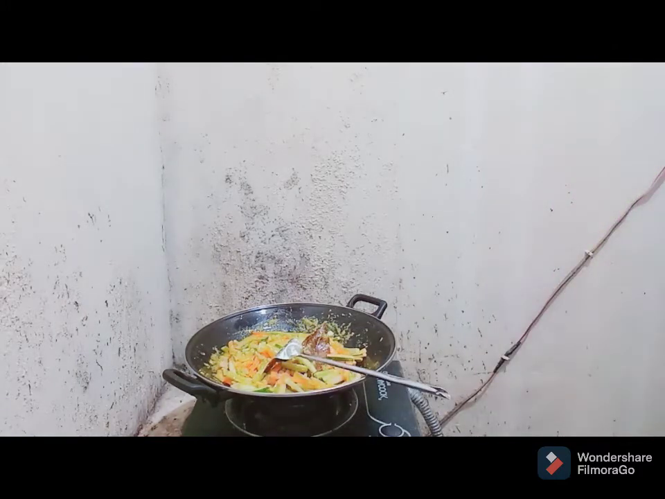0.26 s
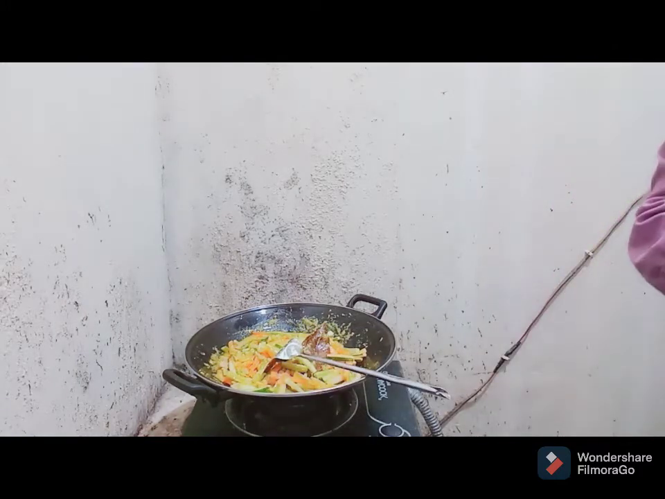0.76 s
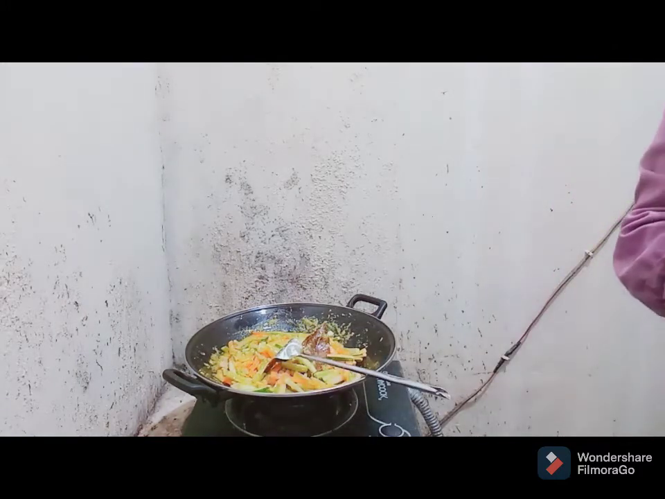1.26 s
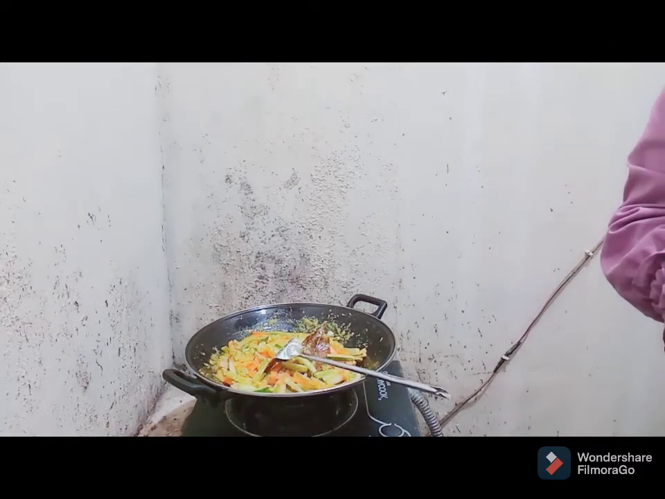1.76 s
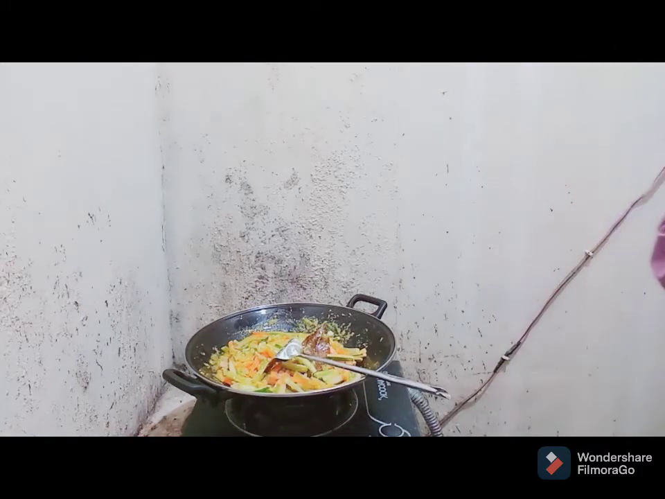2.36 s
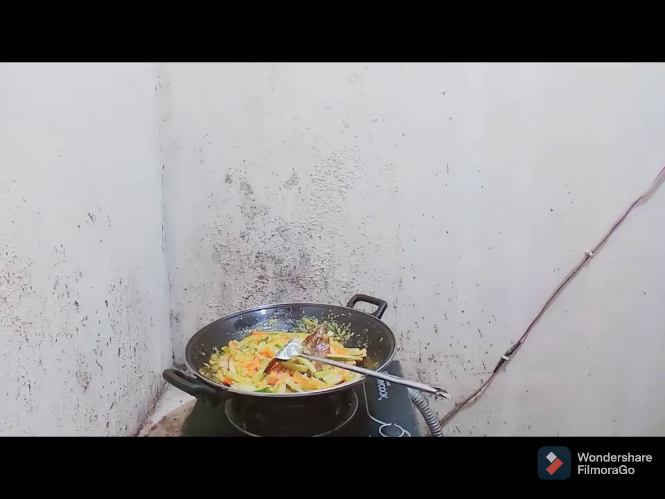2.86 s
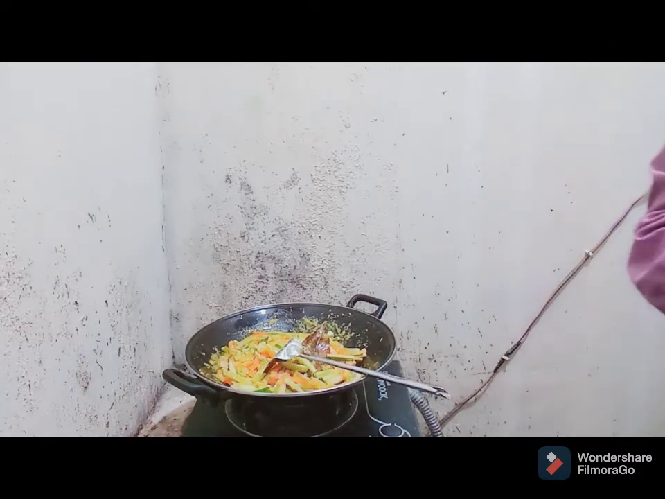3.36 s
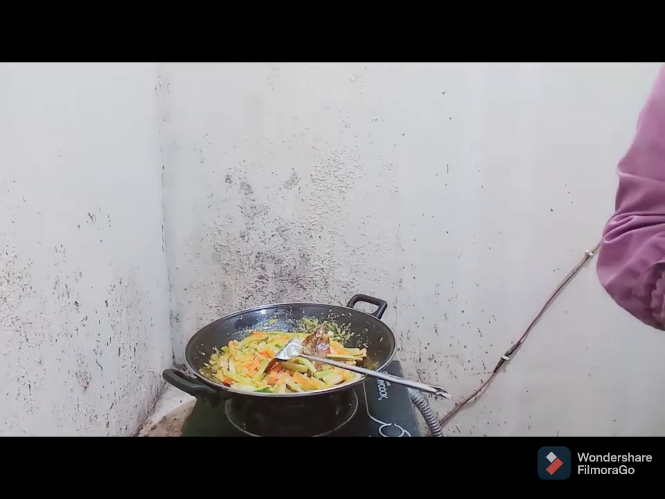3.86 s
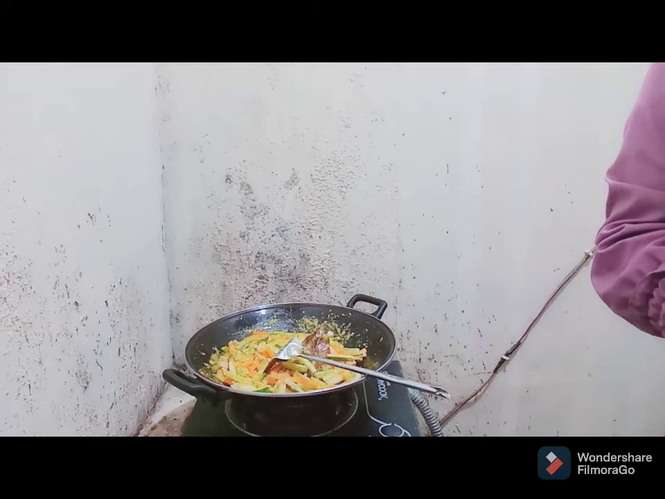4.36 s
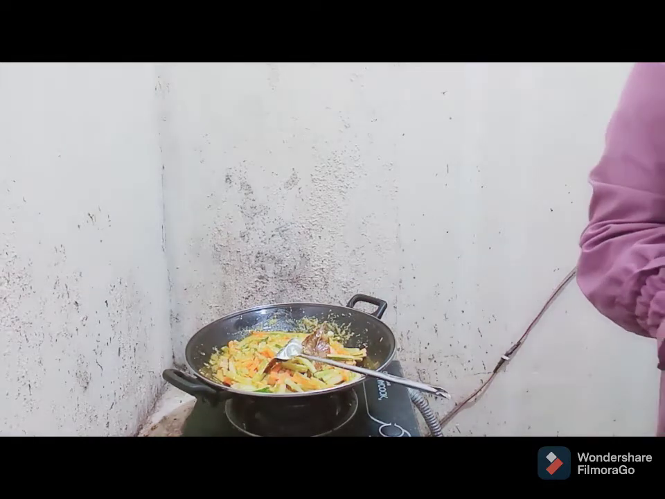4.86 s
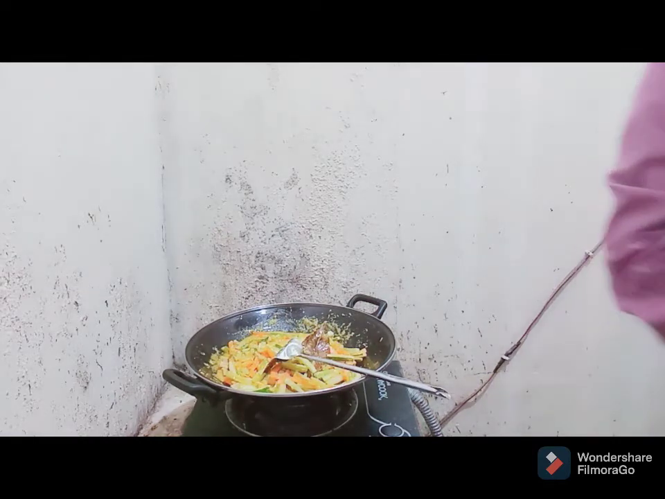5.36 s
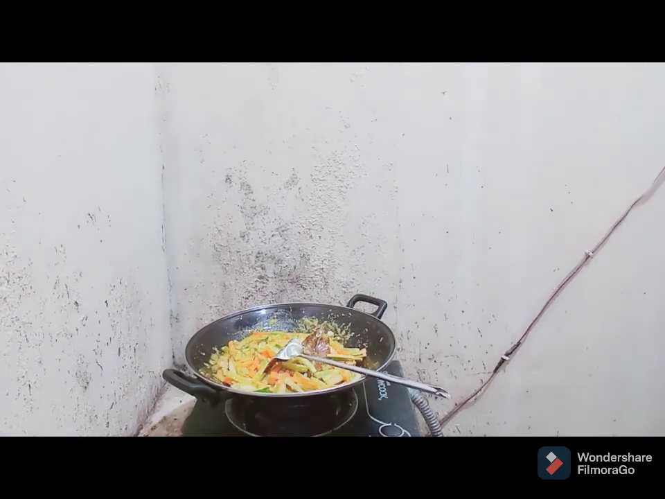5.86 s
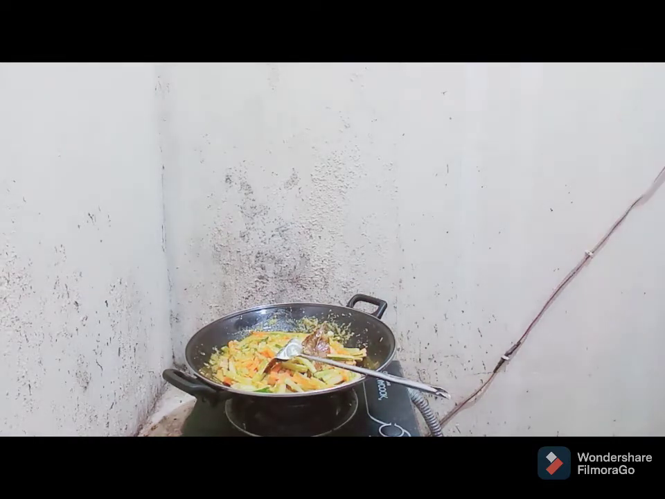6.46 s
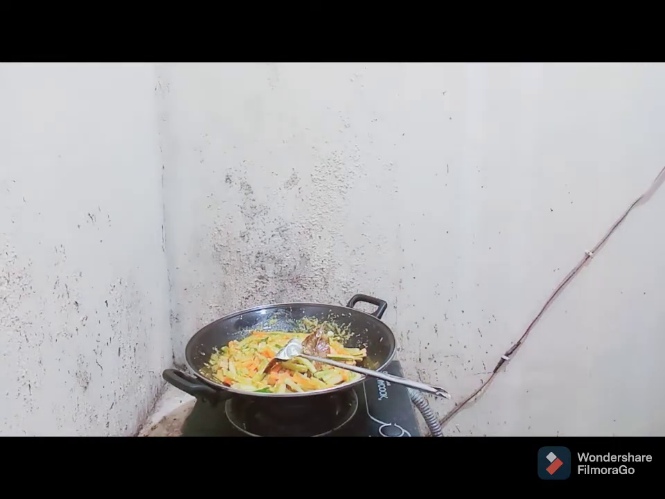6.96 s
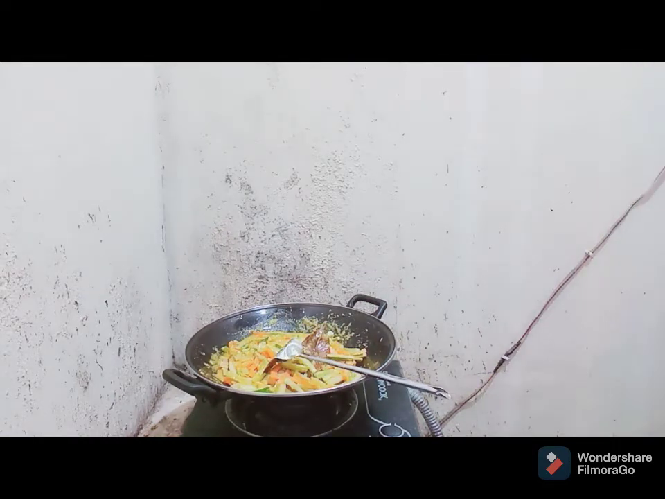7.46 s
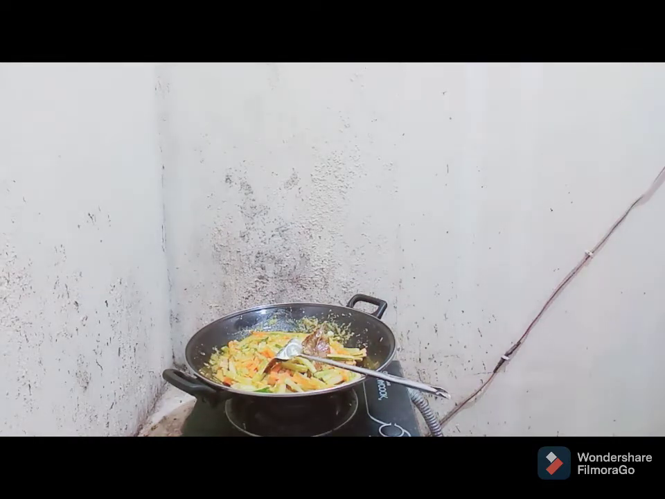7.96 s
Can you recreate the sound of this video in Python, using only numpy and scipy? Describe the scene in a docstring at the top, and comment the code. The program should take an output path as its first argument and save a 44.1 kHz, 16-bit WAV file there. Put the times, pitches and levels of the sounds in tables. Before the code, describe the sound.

Over a steady motor hum in a small hard kitchen, a hollow container knocks down three times, then water splashes and dishes clash with a ringing pot.

```python
"""A motor hums and small squeaks come first, in a small hard-walled kitchen beside the stove.
A hollow container is then knocked down three times and rattles, and a glass clinks faintly.
Later something scrapes, water splashes over dishes, two of them clash and a metal pot is set down and rings.
Hum is sines, struck things are decaying modes with noise cracks, water is drops and bubbles, and rubbing
is shaped noise; all but the motor feed the room's reverberation at the microphone."""
import sys
import numpy as np
from scipy import signal
from scipy.fft import rfft, irfft
from scipy.io import wavfile
from scipy.ndimage import uniform_filter1d

SR = 44100
rng = np.random.default_rng(int(sys.argv[2]) if len(sys.argv) > 2 else 0)


def put_to_file(sound):
    """Save the sound as 16-bit audio at rate SR, in the file named by the first command-line argument."""
    columns = np.atleast_2d(sound).T  # one column per channel
    safe = np.clip(columns, -1, 1)
    whole_steps = np.round(safe * 32767)
    wavfile.write(sys.argv[1], SR, whole_steps.astype(np.int16))


N = 362502
TIME = np.arange(N) / SR  # s


def from_db(db):
    """Decibels to gain."""
    return 10 ** (np.asarray(db) / 20)


def rms_one(x):
    """Scale to rms 1."""
    return x / max(np.sqrt(np.mean(x ** 2)), np.finfo(float).tiny)


def peak_one(x):
    """Scale to peak 1."""
    return x / np.abs(x).max()


def at_hz(points, hz):
    """Read a table on a log-frequency axis."""
    table = np.array(points)
    return np.interp(np.log(hz), np.log(table[:, 0]), table[:, 1])


def in_time(rows):
    """Each column of a curve at every sample, and a smoothed gate that is open while the curve lasts."""
    s, *columns = np.transpose(rows)
    lasts = (TIME >= s[0]) & (TIME <= s[-1])
    gate = uniform_filter1d(lasts * 1.0, size=400)
    return [np.interp(TIME, s, c) for c in columns] + [gate]


def add(out, s, sound):
    """Mix a sound in from time s on."""
    start = max(int(s * SR), 0)
    out[start:start + len(sound)] += sound[:max(N - start, 0)]


def colour(x, spectrum):
    """Give a signal a spectrum through a minimum-phase filter, so nothing sounds early; rms 1."""
    size = 4096
    hz = np.maximum(np.fft.rfftfreq(size, 1 / SR), 5)
    bass_slope = np.minimum(hz / spectrum[0][0], 1) ** 2  # 12 dB per octave below the first point
    gain = from_db(at_hz(spectrum, hz)) * bass_slope
    cepstrum = irfft(np.log(gain))[:size // 2]
    # folding the cepstrum onto positive time gives minimum phase
    response = irfft(np.exp(rfft(2 * cepstrum, size)))
    return rms_one(signal.fftconvolve(x, rms_one(response))[:len(x)])


def drift(rate):
    """Random wander of rms 1, through a new value rate times a second."""
    knots = rng.standard_normal(N // 8)
    return rms_one(np.interp(TIME * rate, np.arange(len(knots)), knots))


def fade(t60, size):
    """Exponential decay by 60 dB in t60 seconds."""
    return np.exp(-np.log(1000) * TIME[:size] / max(t60, 1e-4))


def ring(modes, size):
    """Struck modes, each a decaying sine, of alternating sign."""
    out = np.zeros(size)
    for k, (hz, db, t60) in enumerate(modes):
        sine = np.sin(2 * np.pi * hz * TIME[:size])
        out += (-1) ** k * from_db(db) * fade(t60, size) * sine
    return out


def crack(spectrum, t60, size):
    """The crowd of short-lived modes that a contact excites, as decaying coloured noise."""
    return colour(rng.standard_normal(size) * fade(t60, size), spectrum)


def soften(x, cut_hz):
    """A contact of finite length cannot excite the top."""
    return signal.sosfilt(signal.butter(4, cut_hz, fs=SR, output="sos"), x)


def swell(s, db, half_length):
    """Gaussian rise and fall around time s, as a gain."""
    return from_db(db) * np.exp(-((TIME - s) / half_length) ** 2)


# Motor harmonics: (multiple of the shaft rate, middle level [dB rms])
SHAFT_HARMONICS = [(1, -84), (8, -73.5), (9, -57), (10, -60.5), (11, -69), (12, -85), (13, -74), (21, -74),
                   (22, -71.5), (27, -71.5), (28, -76.5)]
SHAFT_HZ = 49.16
MAINS_HZ, MAINS_DB = 100, -63.5  # middle level, dB rms
# Low steady noise: (frequency [Hz], density [dB per Hz, relative])
RUMBLE_COLOUR = [(30, -26), (48, -1.5), (75, -1.5), (92, 4), (112, 7.5), (135, 0.5), (170, 0), (215, -10),
                 (300, -7.5), (450, -7), (650, -11), (900, -52)]
# Rushing air: (frequency [Hz], density [dB per Hz, relative])
AIR_COLOUR = [(750, -11), (900, -11), (1040, 1), (1200, -6), (1450, -3), (2200, -9), (3300, -11),
              (4200, -17), (4800, -25), (5500, -42), (7000, -33), (8500, -43), (10500, -46), (15000, -49)]
RUMBLE_DB, AIR_DB = -55, -59  # dB rms


def motor(waver_db=1.0, mains_waver_db=5.5):
    """Background: harmonics of the shaft and a wavering mains hum, over rumble and rushing air."""
    turns = 2 * np.pi * np.cumsum(SHAFT_HZ * (1 + 0.001 * drift(1.8))) / SR
    hum = np.zeros(N)
    for multiple, db in SHAFT_HARMONICS:
        phase = round(multiple) * turns + rng.uniform(0, 2 * np.pi)
        hum += from_db(db + waver_db * drift(4.8)) * np.sin(phase)
    mains_level = from_db(MAINS_DB + mains_waver_db * drift(5.5))
    mains = mains_level * np.sin(2 * np.pi * MAINS_HZ * TIME + 0.54 * drift(5.6))
    rumble = from_db(RUMBLE_DB) * colour(rng.standard_normal(N), RUMBLE_COLOUR)
    air = from_db(AIR_DB) * colour(rng.standard_normal(N), AIR_COLOUR)
    return np.sqrt(2) * (hum + mains) + rumble + air  # root 2 turns sine rms into peak


# Decay of the kitchen: (frequency [Hz], t60 [s])
KITCHEN_DECAY = [(200, 0.67), (500, 0.48), (1100, 0.42), (2500, 0.3), (8000, 0.38)]


def kitchen(x, first_s=0.0039, early_db=7, size=20000):
    """Close walls answer at once; a weaker tail dies band by band."""
    edges = [100, 350, 750, 1600, 3500, 16000]  # Hz
    early = from_db(early_db) * fade(.09, size)
    response = np.zeros(size)
    for low, high in zip(edges, edges[1:]):
        band_filter = signal.butter(2, [low, high], "band", fs=SR, output="sos")
        band = signal.sosfilt(band_filter, rng.standard_normal(size))
        tail = fade(at_hz(KITCHEN_DECAY, np.sqrt(low * high)), size)
        response += band * (tail + early)
    response *= np.clip(TIME[:size] / first_s - .5, 0, 1)  # ramps in around first_s
    return signal.fftconvolve(x, response / np.sqrt(np.sum(response ** 2)))[:N]


# Soft handling noises: (time [s], level [dB], half length [s])
HANDLING_SWELLS = [(1.051, -54.5, 0.039), (1.213, -56.5, .1), (1.587, -43.5, 0.0057), (1.643, -44.5, 0.017),
                   (5.473, -59.5, 0.074), (6.032, -50, 0.004), (6.457, -58.5, 0.83), (6.665, -40.5, 0.0073)]
# Their colour: (frequency [Hz], density [dB per Hz, relative])
HANDLING_COLOUR = [(700, 4.5), (1300, -1.5), (2200, -3.5), (3300, -5), (4200, -9), (4800, -21),
                   (5500, -27.5), (7000, -24.5), (8500, -31.5), (10500, -41.5), (15000, -57)]


def handling(grain_db=3):
    """Swells of grainy rustle: coloured noise whose level flickers."""
    level = sum(swell(s, db, length) for s, db, length in HANDLING_SWELLS)
    grain = rng.standard_normal(N) * from_db(grain_db * drift(500))
    return level * colour(grain, HANDLING_COLOUR)


# Outside a stroke the level falls away at these rates
SCRAPE_ATTACK_DB_PER_S, SCRAPE_RELEASE_DB_PER_S = 480, 330


def stroke(start, length):
    """Attack, hold and release of one scraping stroke, as a gain."""
    early = np.maximum(start - TIME, 0)
    late = np.maximum(TIME - start - length, 0)
    fall_db = SCRAPE_ATTACK_DB_PER_S * early + SCRAPE_RELEASE_DB_PER_S * late
    return from_db(np.maximum(-fall_db, -200))


def narrow_noise(hz, glide_hz_per_s, width_hz, s):
    """Noise in one resonance that glides through hz at time s; its skirts are wider than its core."""
    phase = 2 * np.pi * (hz * TIME + glide_hz_per_s * (TIME - s) ** 2 / 2)
    core = drift(width_hz) * np.cos(phase) + drift(width_hz) * np.sin(phase)
    skirts = .5 * drift(2 * width_hz) * np.cos(phase)
    return rms_one(core + skirts)


# Strokes of a thin scrape: (start [s], length [s], relative level [dB])
SCRAPE_STROKES = [(6.147, 0.089, -42), (6.359, 0.046, -43.5)]
# Their colour: (frequency [Hz], density [dB per Hz, relative])
SCRAPE_COLOUR = [(1200, -7), (2200, 3.5), (3300, 7.5), (4200, 6.5), (4800, -1), (5500, -6), (7000, -4.5),
                 (8500, -7), (10500, -28), (15000, -39.5)]
# Things rubbing together, and at 6.494 s the short dull tick of a touch on a glass:
# (time [s], relative level [dB], half length [s], frequency [Hz], glide [Hz per s], width [Hz])
SQUEAKS_AND_TICK = [(0.088, -53, 0.048, 2230, 0, 297), (0.158, -51.5, 0.12, 1875, 0, 331),
                    (0.397, -59, 0.05, 2340, 0, 401), (0.498, -52, 0.12, 1927, 900, 341.5),
                    (6.163, -42.5, 0.026, 4000, 10, 491), (6.287, -38.5, 0.029, 2623, 0, 150.8),
                    (6.335, -37, 0.017, 2610, 0, 852), (6.337, -46, 0.044, 1343, 0, 600),
                    (6.494, -37.5, 0.0068, 3615, 0, 800)]


def friction(grit_db=-4, hiss_db=-14, comb=0.2, judder_db=3.0):
    """An edge hisses along, juddering, coloured by a shifting reflection; surfaces squeak, and a glass ticks once."""
    pressure = sum(from_db(db) * stroke(s, length) for s, length, db in SCRAPE_STROKES)
    noise = rng.standard_normal(N) * from_db(2.3 * drift(300))
    delay_s = .0007 * (1 + .06 * drift(12))
    noise = noise + comb * np.interp(TIME - delay_s, TIME, noise)
    grit = from_db(grit_db) * colour(noise, SCRAPE_COLOUR)
    top = [(7000, 8.5), (8800, 12), (11000, -6), (13000, 0), (15500, -11)]
    hiss = from_db(hiss_db) * colour(noise, top)
    squeaks_and_tick = np.zeros(N)
    for s, db, length, hz, glide, width in SQUEAKS_AND_TICK:
        squeaks_and_tick += swell(s, db, length) * narrow_noise(hz, glide, width, s)
    return (pressure * (grit + hiss) + squeaks_and_tick) * from_db(judder_db * drift(70))


# Colour of splashing, also of the touch on a glass: (frequency [Hz], density [dB per Hz, relative])
SPLASH_COLOUR = [(600, -9), (1300, -4), (2200, -6), (3300, 0.8), (4200, -3.5), (4800, -10), (5500, -25),
                 (7000, -19.5), (8500, -27), (10500, -38), (15000, -32)]
# Light touches on a glass: (time [s], ring peak [dB], loss away from 3400 Hz [dB per octave])
GLASS_TOUCHES = [(.635, -44, 2), (2.092, -26, -1.5), (3.044, -37, 10), (3.635, -28.5, 5.5),
                 (6.491, -34.5, 25)]
# Its modes: (frequency [Hz], relative level [dB], t60 [s])
GLASS_MODES = [(1714, -1, .22), (2698, 0, .1), (3628, -11, .17), (4120, -23, .1), (4700, -22, .18),
               (6395, -29, .1), (8300, -39, .1)]


def glass(tick_db=-8, size=14000):
    """Ringing modes; each touch has its own loss away from the middle ones, and a short tick marks the contact."""
    out = np.zeros(N)
    for s, db, loss in GLASS_TOUCHES:
        modes = [(hz, g - loss * abs(np.log2(hz / 3400)), t60) for hz, g, t60 in GLASS_MODES]
        tick = from_db(tick_db + loss / 2) * peak_one(crack(SPLASH_COLOUR, 0.015, size))
        add(out, s, from_db(db) * (peak_one(ring(modes, size)) + tick))
    return soften(out, cut_hz=8500)


# Water running over the dishes: (time [s], relative level [dB])
STREAM_LEVEL = [(6.8, -57.5), (6.93, -52.5), (7.06, -47), (7.202, -50), (7.322, -46.5), (7.538, -39),
                (7.986, -43.5), (8.112, -44.5), (8.22, -39)]


def bubble(hz, cycles, rise, size=3000):
    """A bubble swells within a cycle or two, rings, and rises in pitch as it nears the surface."""
    t60, t = cycles / hz, TIME[:size]
    glide = 1 + rise * np.minimum(t / t60, 1)
    onset = 1 - np.exp(-(t * hz) ** 2)
    return onset * fade(t60, size) * np.sin(2 * np.pi * np.cumsum(hz * glide) / SR)


def bubbles(low_hz, high_hz, cycles, spread_db, count):
    """Bubbles of random size and strength while the water runs; rms 1 from its start on."""
    out, start, end = np.zeros(N), STREAM_LEVEL[0][0], STREAM_LEVEL[-1][0]
    for when, pitch, strength in rng.random((count, 3)):
        hz = low_hz * (high_hz / low_hz) ** pitch
        gain = from_db(-spread_db * np.sqrt(strength))
        add(out, start + when * (end - start), gain * bubble(hz, cycles, rise=.05))
    return out / np.std(out[int(start * SR):])


# The loudest plops of water: (time [s], relative level [dB], starting pitch [Hz])
LARGE_PLOPS = [(6.8658, -26, 3080), (6.977, -23, 3140), (7.0454, -26, 3780), (7.182, -23.5, 3620),
               (7.2454, -27, 1850), (7.444, -51, 3080), (7.6782, -18, 2560), (7.9168, -16, 2280),
               (7.9348, -15.5, 3500), (8.0386, -21, 2070), (8.0835, -22, 3160)]
# Each rings for so many cycles and throws up a surge of spray, in proportion to its size
PLOP_CYCLES, SURGE_DB, SURGE_S = 75, -21, 0.022


def water(splash_db=-2, gurgle_db=-1, glug_db=-6, fizz_db=-21, drops_per_s=1500, spread_db=2.0,
          clump_db=4.0, plop_db=-1):
    """Droplets patter in clumps and bubbles ring among them; each large plop throws up a surge of both."""
    level, gate = in_time(STREAM_LEVEL)
    size_db = spread_db * np.minimum(rng.exponential(1, N), 4) + clump_db * drift(100)
    sizes = from_db(size_db) * rng.choice([-1, 1], N)
    drops = sizes * (rng.random(N) < drops_per_s / SR)
    flow = from_db(splash_db) * colour(drops, SPLASH_COLOUR)
    gurgle = from_db(gurgle_db) * bubbles(1400, 4300, cycles=50, spread_db=27, count=640)
    glugs = from_db(glug_db) * bubbles(1700, 3810, cycles=PLOP_CYCLES, spread_db=25, count=30)
    fizz = from_db(fizz_db) * bubbles(5430, 8850, cycles=77, spread_db=28, count=420)
    plops, surges = np.zeros(N), np.zeros(N)
    age = TIME[:6000] / SURGE_S
    for s, db, hz in LARGE_PLOPS:
        add(plops, s, from_db(db + plop_db) * bubble(hz, PLOP_CYCLES, rise=0.11))
        add(surges, s, from_db(db + SURGE_DB) * (1 + age) * np.exp(-age))
    stream = gate * from_db(level)
    return (stream + surges) * (flow + gurgle + fizz) + stream * glugs + plops


# Modes of plate, bowl and metal pot: (frequency [Hz], relative level [dB], t60 [s])
PLATE_MODES = [(1287, -1, 0.37), (1610, -9, 0.47), (1960, -21, .1), (2020, 6.5, 0.13), (2727, 4.5, 0.33),
               (2944, -15, .14), (3730, 2.5, .1), (3760, -10, 0.21), (4050, -16, .15), (5700, -10, 0.11),
               (6071, -6, 0.21), (6930, -6, 0.21), (8470, -14, 0.12), (7980, -2.5, 0.2)]
BOWL_MODES = [(1305, -9, 0.31), (1440, -1.5, 0.094), (1550, -13, 0.29), (1993, -1.5, 0.28),
              (2340, -20, 0.17), (2660, 3.5, 0.15), (2730, -15, 0.12), (3600, -1, 0.11), (3597, -6, 0.23),
              (3780, -21, 0.14), (5570, -33, 0.17), (6500, -11.5, 0.058), (6860, -26, .12),
              (7800, -19, 0.23), (8950, -17, 0.073)]
POT_MODES = [(155.6, -16, 0.15), (254, -4, 0.16), (337, -8, .12), (373, -1, 0.3), (397, -6.5, 0.11),
             (613, -3, 0.5), (748, -3, 0.24), (893, 0.5, .14), (986.5, 3, 1.6), (1038.4, 3, 1.3),
             (1278, -14, 0.84), (1600, 2.5, 0.17), (2050, -14, .7), (2373, -4.5, 0.37), (2540, 0, 0.24),
             (2700, -6.5, 0.18), (3100, -22, .12), (3360, -24.5, .25), (3540, -14.5, 0.44),
             (3980, -12.5, 0.41)]
# Heavy blows, on plate, pot and bowl in turn:
# (time [s], ring gain [dB], crack level at its onset [dB rms], crack t60 [s])
DISH_BLOWS = [(7.331, -38, -28, 0.35), (7.513, -25.5, -18, 0.21), (8.163, -24, -25.5, 0.18)]
# Colour of the cracks: (frequency [Hz], density [dB per Hz, relative])
DISH_CRACK_COLOUR = [(800, -12), (1400, -6.5), (2200, -1), (3300, 1), (4200, -8.5), (4800, -39),
                     (5500, -21), (7000, -23), (8500, -24.5), (10500, -39), (15000, -44)]
POT_CRACK_COLOUR = [(120, -21), (350, 1), (700, -2.5), (1200, 0.5), (1900, -26.5), (2700, -4),
                    (3300, -21.5), (4200, -18), (4800, -39), (5500, -48), (7000, -53), (8500, -61),
                    (10500, -59.8), (15000, -61)]


def dishes(size=40000):
    """Plate, pot and bowl crack and ring; the two rim modes of the pot beat against each other."""
    out = np.zeros(N)
    struck = [(PLATE_MODES, DISH_CRACK_COLOUR), (POT_MODES, POT_CRACK_COLOUR), (BOWL_MODES, DISH_CRACK_COLOUR)]
    for (s, ring_db, crack_db, t60), (modes, spectrum) in zip(DISH_BLOWS, struck):
        burst = crack(spectrum, t60, size)
        burst = burst / np.std(burst[:400])  # level set by the onset
        ringing = soften(ring(modes, size), cut_hz=8200)
        add(out, s, from_db(ring_db) * ringing + from_db(crack_db) * burst)
    return out


# After the first fall it rattles to rest: every bounce comes sooner and weaker than the last
RATTLE_START_S, RATTLE_GAP_S, RATTLE_GAP_RATIO, RATTLE_BOUNCES = 1.8244, .031, .705, 5
RATTLE_DB, RATTLE_LOSS_DB = -10, 3  # first bounce, loss per bounce
RATTLE_THUD_DB, RATTLE_SNAP_DB, RATTLE_HZ = -25, -10.5, 1156


def rattle():
    """The bounces of the settling container, as rows like those of its knocks."""
    gaps = RATTLE_GAP_S * RATTLE_GAP_RATIO ** np.arange(RATTLE_BOUNCES)
    times = RATTLE_START_S + np.cumsum(gaps) - gaps
    return [(s, RATTLE_DB - RATTLE_LOSS_DB * k, RATTLE_THUD_DB, RATTLE_SNAP_DB, RATTLE_HZ)
            for k, s in enumerate(times)]


# Container striking the counter, levels before its bass is cut:
# (time [s], peak level [dB], thud [dB, relative], snap [dB, relative], pitch of the knock [Hz])
CONTAINER_KNOCKS = [(1.7228, -13, -14, -11, 705), (1.7394, -1.5, -26, -26, 1180),
                    (1.7457, -8.5, -17, -2, 1120), (1.7492, -5, -3.5, -19, 1155),
                    (1.7611, -9, -13, -17, 1120), (1.777, -7, -8, -6, 1300), (1.7969, -7, -4, -11, 1160),
                    (1.8038, -6.5, -17, -14.5, 1120), (3.3738, -1.5, -19.5, -3.5, 898),
                    (3.3778, -4.5, -0.5, -43, 835), (3.478, -12.5, -15, -24.5, 860),
                    (3.5268, -17, -32, -16, 1020), (3.568, -20, -8.5, -1.5, 760), (4.9938, -4, 0.5, 0, 843),
                    (5.009, -1, -34, -11.5, 1190), (5.0161, -2, -21, -39, 1120),
                    (5.0765, -25.5, -15, 5, 1170), (5.083, -17, -22, -3, 1110),
                    (5.387, -26.5, -20, -15.5, 920), (6.658, -25, -4.5, -27, 1100)]
# Its low modes: (frequency [Hz], relative level [dB], t60 [s])
THUD_MODES = [(271, -5.5, .06), (420, 10, 0.039), (560, 3, 0.032)]
# Colour of its snap, then of its crack: (frequency [Hz], density [dB per Hz, relative])
SNAP_COLOUR = [(1300, 6), (1500, 11.5), (1850, 0), (2350, 8.5), (2750, 1.5), (3200, 1), (3850, -1.5),
               (4500, -15.5), (5500, -28), (15000, -59)]
KNOCK_CRACK_COLOUR = [(160, -32.5), (280, -2.5), (600, -10.5), (1150, 8.5), (1700, -4.5), (2200, -74.5),
                      (3300, -31), (4200, -22), (4800, -27.5), (5500, -37.5), (7000, -40), (8500, -47.5),
                      (10500, -74.5), (15000, -74)]


def container(knock_t60=0.02, snap_t60=0.019, crack_t60=0.035, crack_db=-7, snap_db=1, tick_db=-40, size=6000):
    """Main source: each contact gives a low thud, a damped hollow knock, a bright snap, a crack and a tiny tick."""
    tick_colour = [(3000, 19), (4300, -15), (5500, -14.0), (8000, 5.5), (10500, -14.5), (15000, -36)]
    out = np.zeros(N)
    for s, db, thud_db, snap, hz in list(CONTAINER_KNOCKS) + rattle():
        knock = rms_one(ring([(hz, 0, knock_t60)], size))
        thud = from_db(thud_db) * rms_one(ring(THUD_MODES, size))
        hit = soften(knock - thud, cut_hz=3230)
        hit = hit + from_db(snap + snap_db) * rms_one(crack(SNAP_COLOUR, snap_t60, size))
        hit = hit + from_db(crack_db) * rms_one(crack(KNOCK_CRACK_COLOUR, crack_t60, size))
        add(out, s, from_db(db) * peak_one(hit))
        tick = crack(tick_colour, 0.003, size=1000)
        add(out, s, from_db(db + tick_db) * peak_one(tick))
    # so small a body radiates no bass
    return signal.sosfilt(signal.butter(4, 245, "high", fs=SR, output="sos"), out)


def scene():
    """All sources at the microphone; more room makes a source seem farther off, and the motor gets none."""
    sources = [  # (sound, share sent to the room [dB])
        (friction() + handling(), -5.5), (water(), -7.5), (dishes(), -8.5),
        (container(), -10.5), (glass(), -16.0)]
    direct = sum(sound for sound, _ in sources)
    room = kitchen(sum(from_db(share_db) * sound for sound, share_db in sources))
    return (direct + room + motor())[None]


CUTOFF_HZ = 15500


def record(dry):
    """Peaks are limited to full scale, the highest treble droops and the top is cut."""
    limited = np.clip(dry, -1, 1)
    drooped = signal.sosfilt(signal.butter(2, 13000, fs=SR, output="sos"), limited)
    return signal.sosfilt(signal.ellip(10, .1, 80, CUTOFF_HZ, fs=SR, output="sos"), drooped)


dry = scene()
out = record(dry)
put_to_file(out)
```